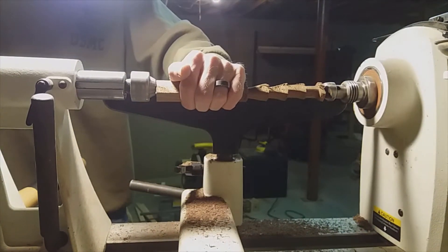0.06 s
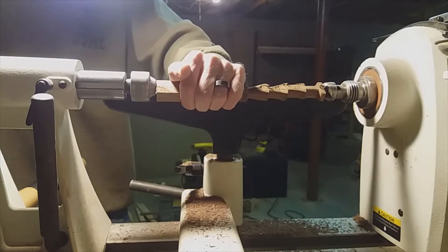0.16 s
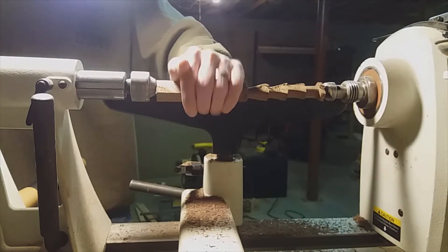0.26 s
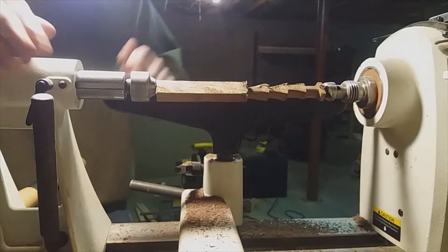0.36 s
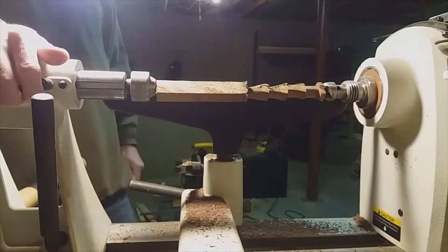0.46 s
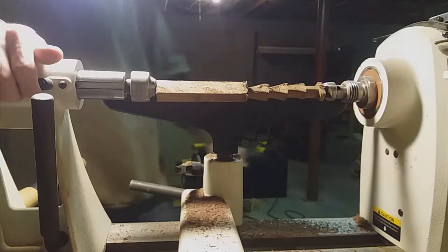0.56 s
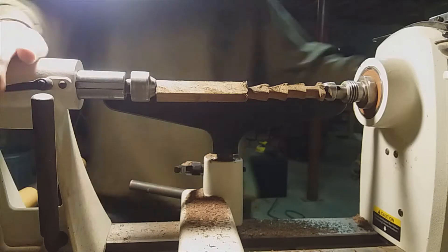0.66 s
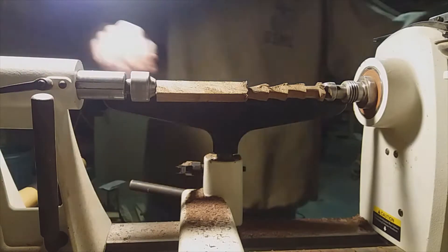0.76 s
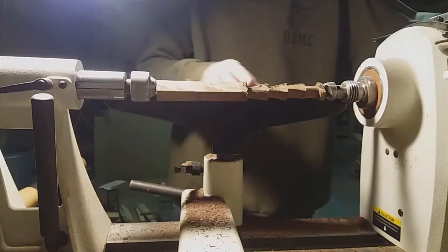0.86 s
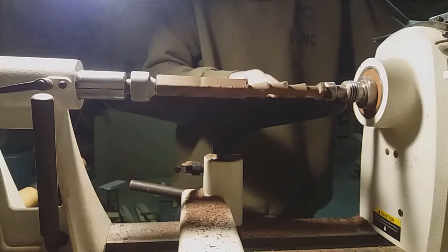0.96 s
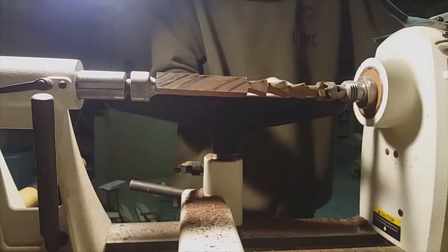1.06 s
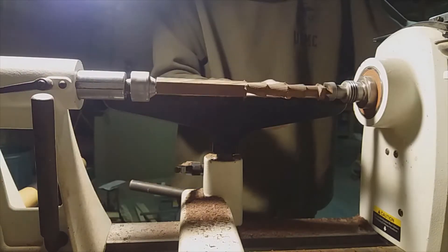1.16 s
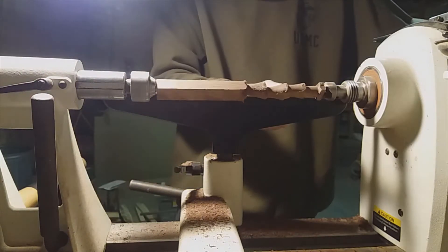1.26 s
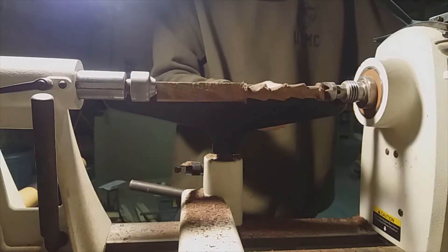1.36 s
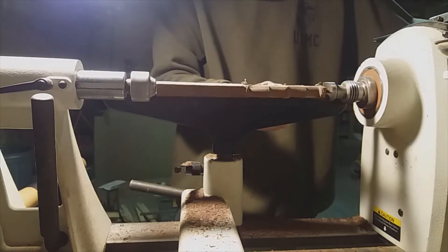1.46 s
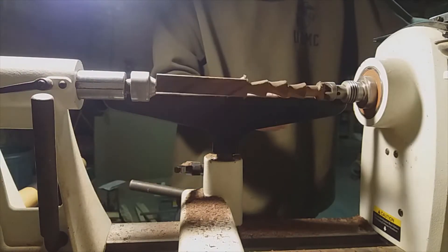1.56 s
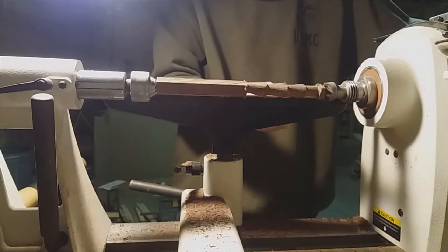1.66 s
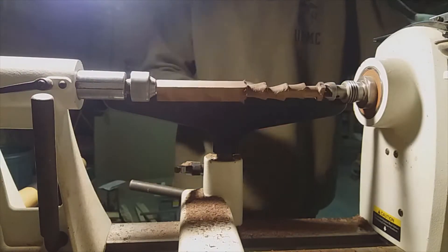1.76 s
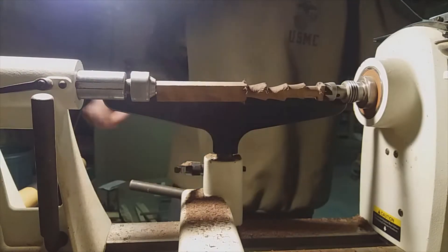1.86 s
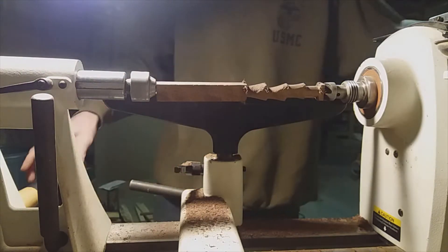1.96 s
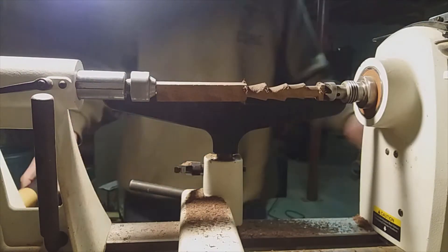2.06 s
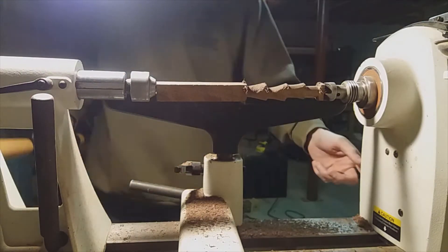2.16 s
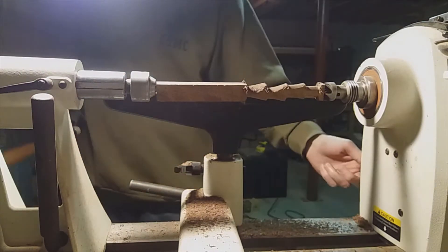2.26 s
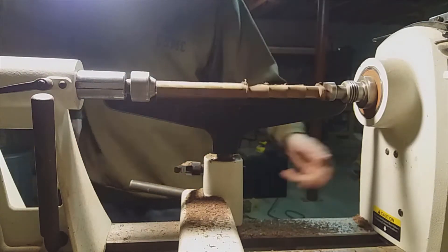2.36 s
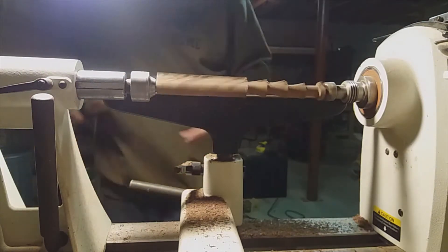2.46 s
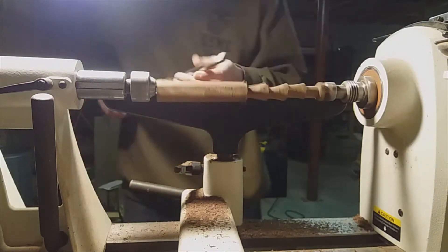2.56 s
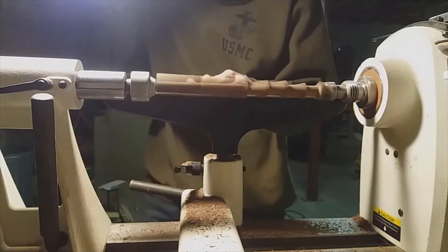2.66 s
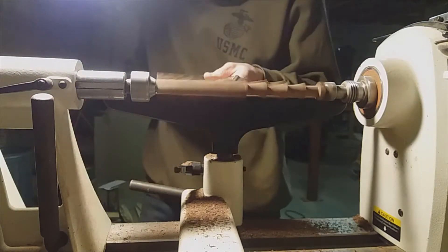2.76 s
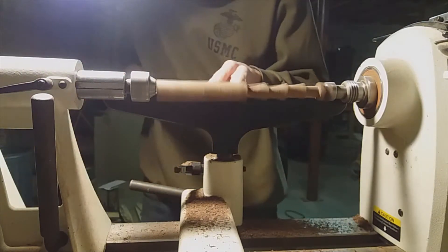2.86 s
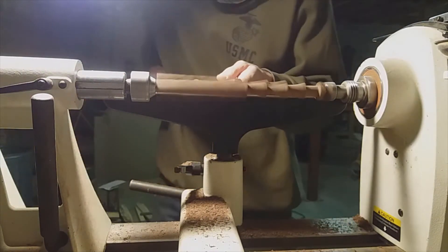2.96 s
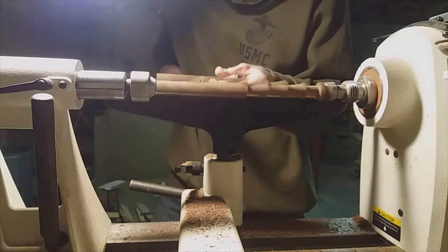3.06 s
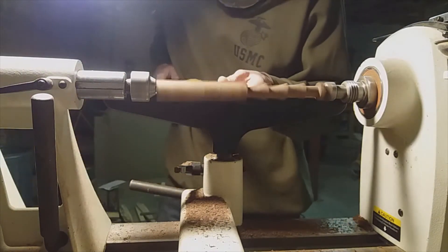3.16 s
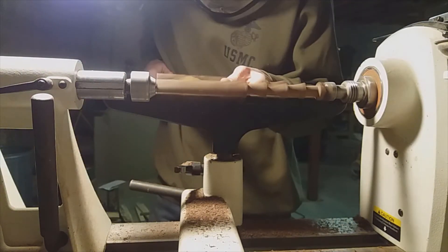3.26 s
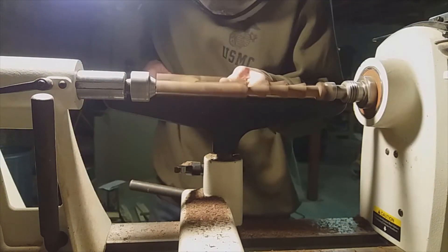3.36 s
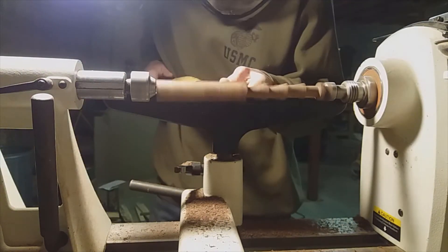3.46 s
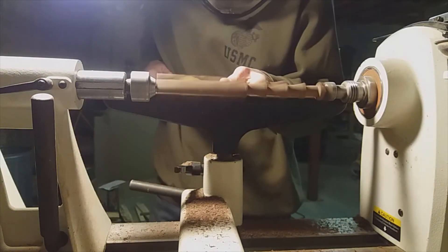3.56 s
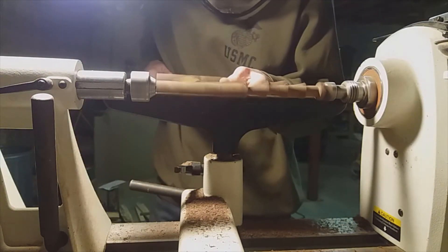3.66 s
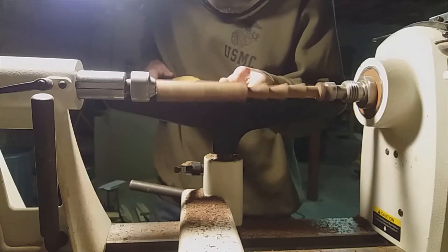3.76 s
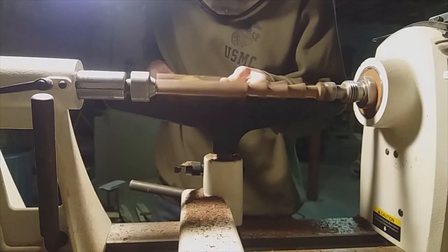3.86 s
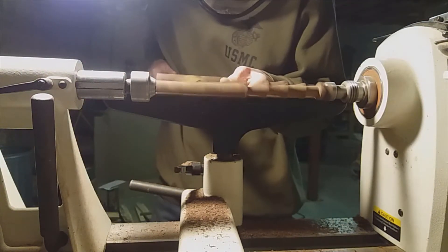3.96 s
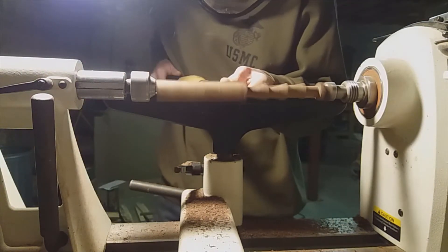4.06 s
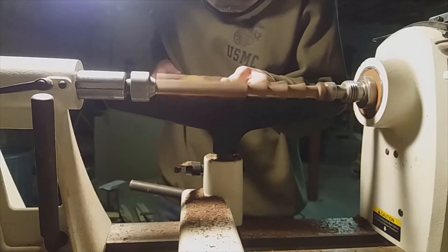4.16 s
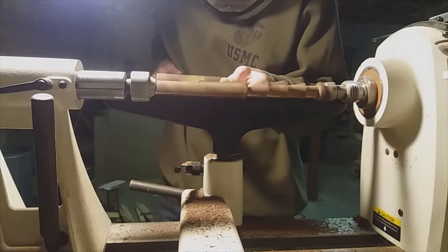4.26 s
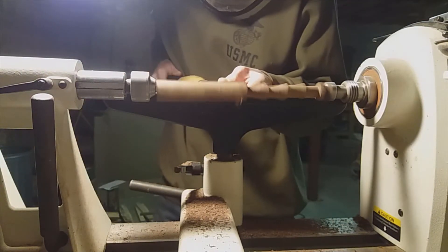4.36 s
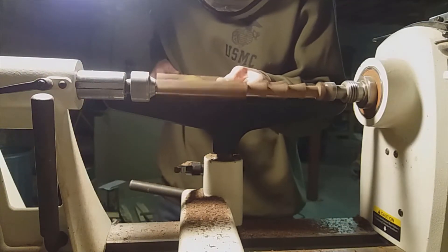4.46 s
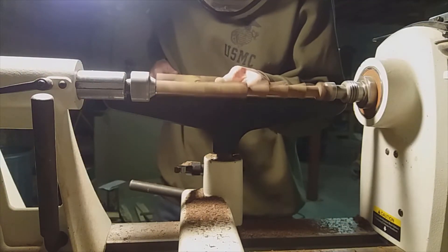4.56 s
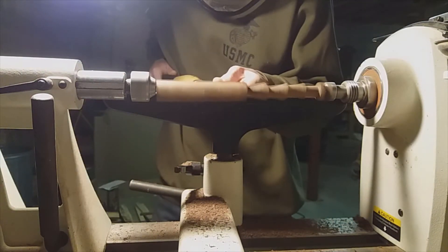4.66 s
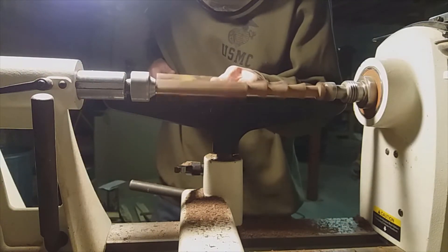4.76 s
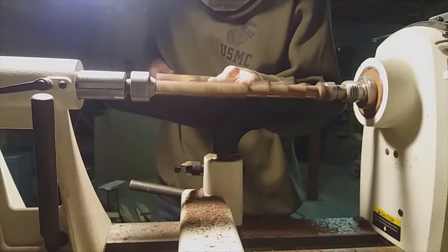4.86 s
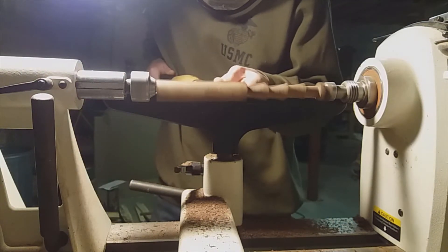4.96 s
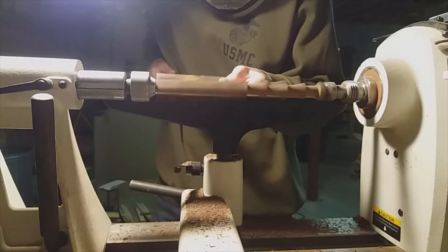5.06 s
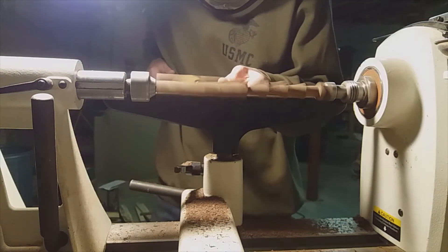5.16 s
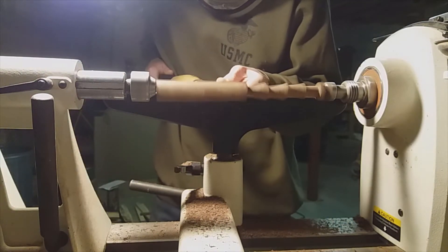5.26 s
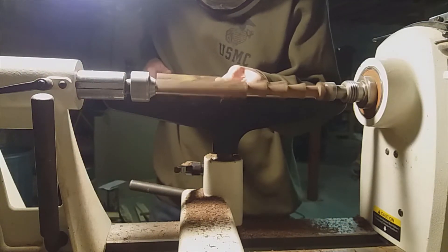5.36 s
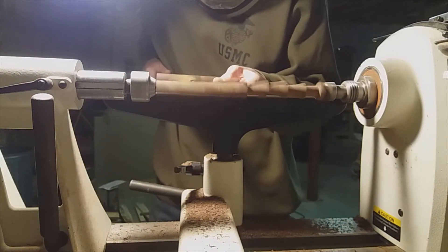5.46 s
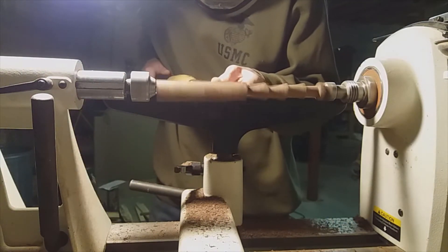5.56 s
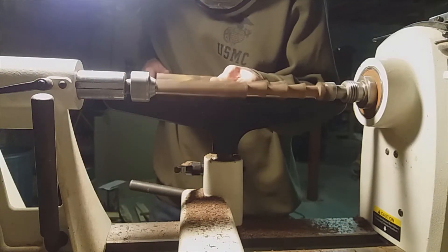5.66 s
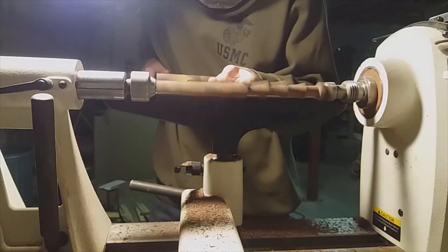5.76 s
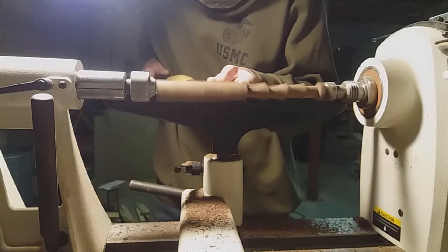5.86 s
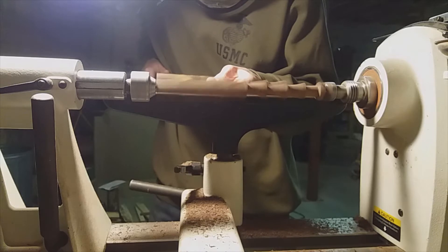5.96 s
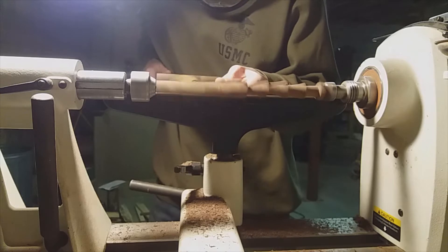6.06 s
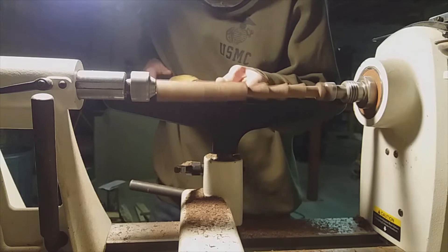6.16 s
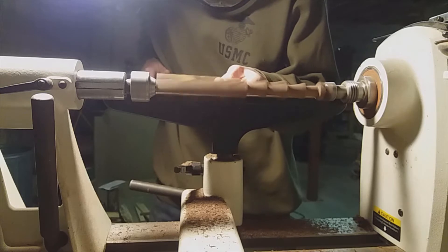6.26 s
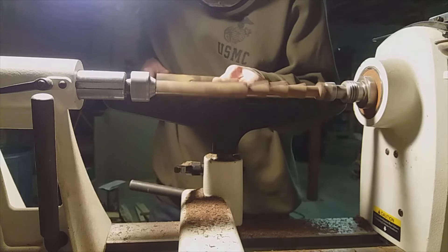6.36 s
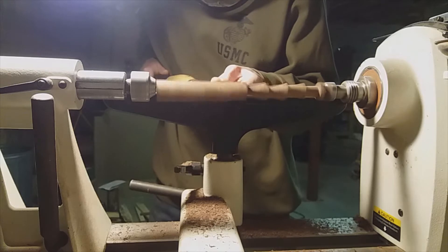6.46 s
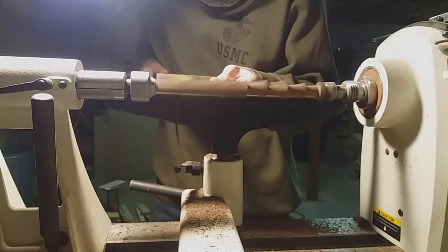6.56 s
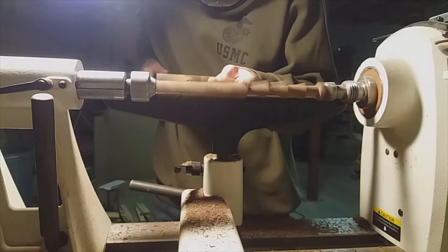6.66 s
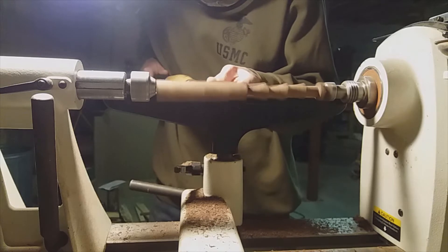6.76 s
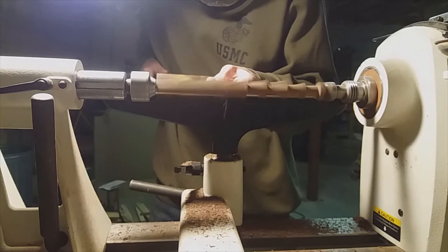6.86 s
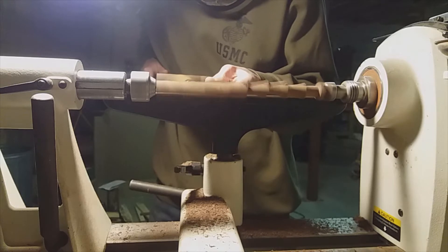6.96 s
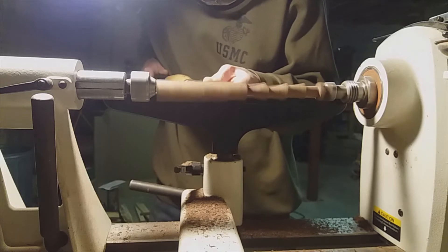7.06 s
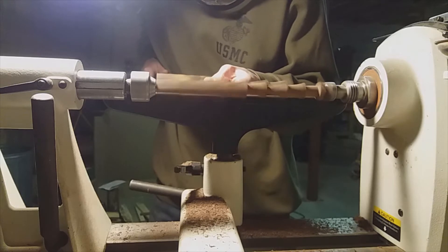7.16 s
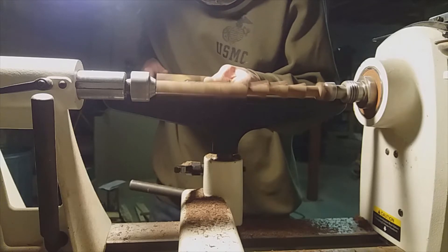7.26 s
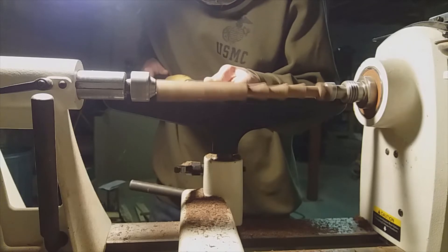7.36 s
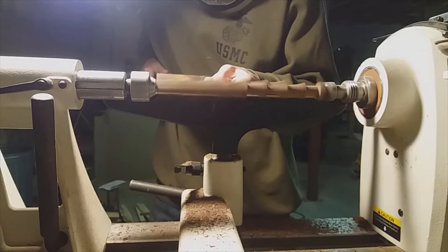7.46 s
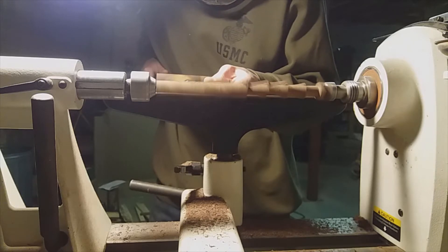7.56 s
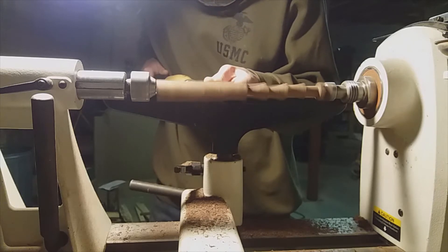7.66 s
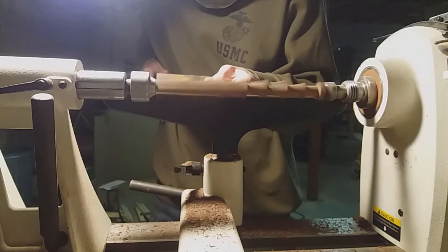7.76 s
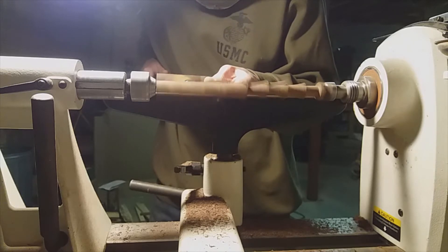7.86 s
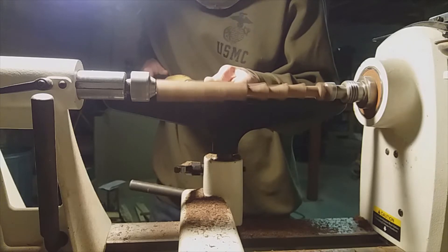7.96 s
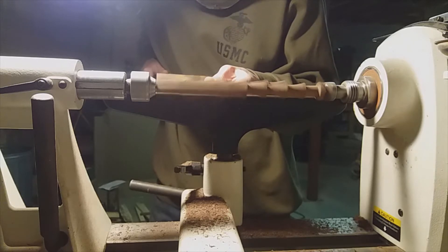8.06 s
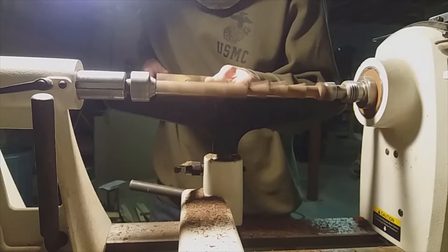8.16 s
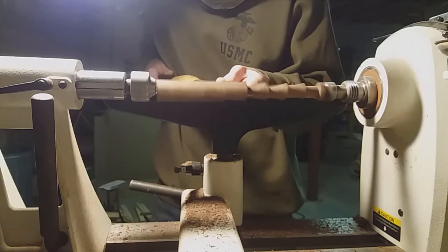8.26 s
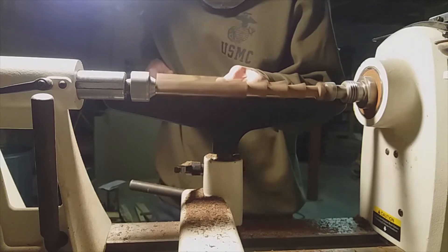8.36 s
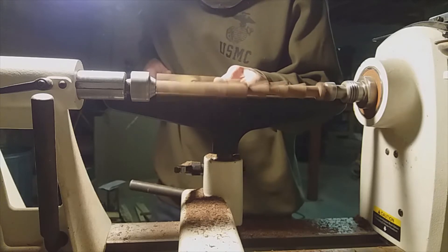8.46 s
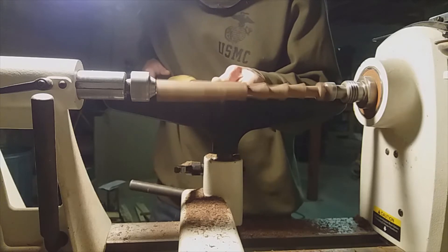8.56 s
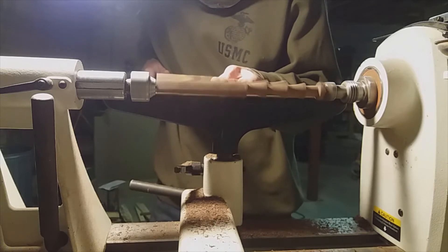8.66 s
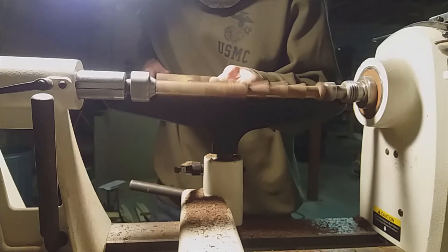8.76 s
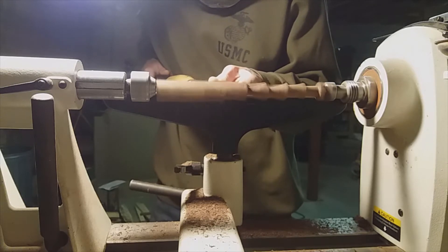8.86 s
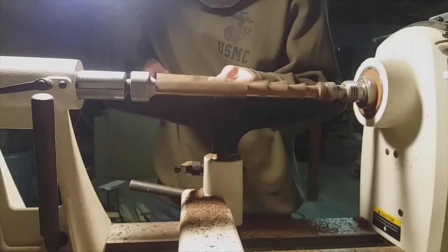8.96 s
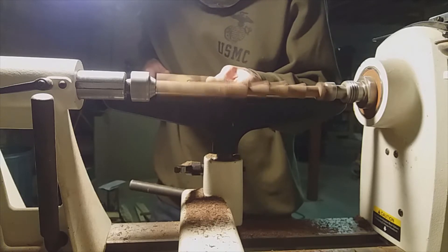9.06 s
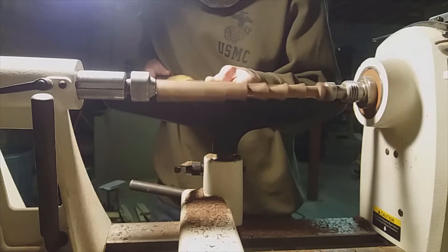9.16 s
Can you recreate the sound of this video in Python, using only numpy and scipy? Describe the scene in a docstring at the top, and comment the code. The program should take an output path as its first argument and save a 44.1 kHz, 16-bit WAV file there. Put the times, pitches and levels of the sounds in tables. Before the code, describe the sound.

For the first 2.3 seconds a workshop fan hums and rushes quietly, with faint brushes of cloth near 0.45, 0.8 and 2.0 seconds. At 2.3 a switch clicks sharply with a short boxy knock, and a wood lathe whines up from rest, reaching full speed by 2.9. It holds a high, slowly beating whistle over motor drone, frame rumble and bearing hiss; a small tick comes near 3.2. Sandpaper then presses the spinning wood in five strokes: 4.0-4.9, 5.1-6.0, 6.2-6.9, 7.15-8.15 and 8.3-9.2. Each is a harsh, rapid flutter of about 57 bites a second, with ringing chatter around 2-3 kHz, squeal, gritty hiss and hollow woody resonance. The first lands abruptly and surges unevenly. At 4.7 the bass drops and stays thin. The fourth grows and briefly screeches near 8.1. The lathe whines on between and after strokes. Close pickup, leaning left.

```python
"""A fan hums and rushes and cloth brushes softly; then a switch clicks and a wood lathe whines up to speed.
Sandpaper pressed on the spinning wood in five strokes bites once a turn, because the wood is not quite round:
a fast rasping flutter that rings the workpiece. Part way through, the bass steps down and stays down.
The wood and frame are modal resonators driven by noise, the motor, belt and fan hum are sums of sines,
and the air, grit, bearings and cloth are noise shaped by spectra."""
import sys
import numpy as np
from scipy import signal
from scipy.fft import rfft, irfft, next_fast_len
from scipy.io import wavfile
from scipy.ndimage import map_coordinates

SR = 44100
rng = np.random.default_rng(int(sys.argv[2]) if len(sys.argv) > 2 else 0)


def int16_out(signal):
    """Quantize to a 16-bit WAV file."""
    q = np.round(np.clip(np.atleast_2d(signal).T, -1, 1) * 32767)
    wavfile.write(sys.argv[1], SR, q.astype(np.int16))


N = 405276  # samples

# Sanding strokes. Each row: start in seconds, end in seconds, attack in seconds, chatter of the wood in dB,
# its squeal in dB, hiss of the grit in dB, hollow ring in dB, growth in dB per second, landing in dB,
# rebound in dB. The four sound levels are those before the pressure of the hand is added.
STROKES = [(4.032, 4.901, 0.0015, -30, -32, -35.5, -34, 4.5, 8, 4),
           (5.092, 5.969, 0.0048, -25.5, -27.5, -28, -27.5, -1, -2, 2),
           (6.184, 6.929, 0.0082, -25.5, -27.5, -28.5, -31, 2, 2, -1.5),
           (7.154, 8.157, .002, -24.5, -23.5, -28, -35, 5, -1.5, 2),
           (8.336, 9.195, 0.0069, -25, -26, -28.5, -33.5, -2, -1, 0.5)]
# Brief changes of the hand's pressure within a stroke. Each row: time in seconds, change in dB.
PUSHES = [(4.322, 6), (4.357, -4.5), (4.395, 4), (4.515, 3.5), (4.607, 5.5), (4.675, -5.5), (4.792, 6),
          (5.36, 1.5), (5.925, 1.5), (6.385, 1.5), (6.88, 2.5), (7.84, 2), (7.9, -0.5), (8.14, 0), (8.5, 2),
          (8.76, 3.5), (9.11, -3)]
# How hard the paper bites round one turn. Each row: share of a turn, level in dB.
BITE_ROUND_TURN = [(0, -1.5), (.16, -8), (.35, -11.5), (.63, -15.5), (.7, -3), (.8, -0.5), (.9, -4)]
# Chattering high modes of the workpiece between its centres. Each row: frequency in Hz, width in Hz, level in dB.
CHATTER_MODES = [(1729, 17, 6.5), (1898, 99, 3.5), (2052, 77, 9), (2315, 74, 8), (2590, 90, -3.5),
                 (2764, 26, 8.5), (2960, 11, 16), (4920, 42, -6.5)]
# Hollow low modes of the workpiece. Each row: frequency in Hz, width in Hz, level in dB.
HOLLOW_MODES = [(919, 11.5, -13.5), (1151.8, 23, -3.5), (1268, 7.2, 2)]
# Left-right likeness of the wood's ring. Each row: frequency in Hz, coherence.
WORKPIECE_LIKENESS = [(1000, 0.89), (2300, 0.72), (3200, 0.25)]
# Hiss of the grit. Each row: frequency in Hz, relative density in dB per Hz.
GRIT_SPECTRUM = [(300, -25), (1400, -4.5), (3200, 3), (4000, -6.5), (5500, -4.5), (6450, 1.5), (7500, -2),
                 (9000, -7), (10200, -4), (12000, -11.5), (13500, -3), (14800, -12), (16000, -11)]
# Snags of the paper. Each row: time in seconds, half length in seconds, level in dB.
SNAGS = [(8.075, 0.041, -23)]
# Resonances of the screech. Each row: frequency in Hz, width in Hz, level in dB.
SCREECH_MODES = [(1660, 110, 8), (3350, 280, 6), (4950, 340, 6), (6650, 610, 0)]
# Run-up of the lathe. Each row: time in seconds, share of full speed.
SPEED = [(2.35, 0), (2.5, .35), (2.62, .6), (2.71, .72), (2.77, .8), (2.8, .89), (2.85, .965), (2.91, 1)]
# Motor lines. Each row: multiple of the motor's speed, rms level in dB before the drone or whistle gain.
MOTOR_ORDERS = [(5, -53), (6, -38), (12, -44), (16, -53), (18, -56), (24, -52), (35, -43), (36, -40.5),
                (37, -48), (48, -61)]
# Belt lines. Each row: multiple of the belt's rate, rms level in dB before the drone or whistle gain.
BELT_ORDERS = [(7, -58.5), (9, -57), (11, -56.5), (14, -49)]
# How the motor housing favours each pitch. Each row: frequency in Hz, gain in dB.
HOUSING_GAIN = [(150, -34), (420, -17.5), (490, -2), (1800, 17), (2100, 18), (2600, 11), (2800, 12),
                (2930, 25), (3100, 17), (3250, 10), (4000, -4)]
# Resonances of the lathe's frame. Each row: frequency in Hz, width in Hz, level in dB.
FRAME_MODES = [(240, 77, -13), (372, 94, -5), (513, 85, -2.5), (824, 14.5, 8), (1000, 66, -6),
               (1240, 72, -3.5)]
# Hiss of the bearings. Each row: frequency in Hz, relative density in dB per Hz.
BEARINGS_SPECTRUM = [(600, -25), (1700, -13.5), (2080, -4.5), (2400, -9.5), (2800, -10.5), (3000, 5.5),
                     (3300, -7.5), (4700, -14.5), (6500, -11.5), (9000, -18), (12500, -25.5), (16000, -28)]
# Rings of the tail centre running free. Each row: frequency in Hz, width in Hz, level in dB.
CENTRE_FREE = [(6556, 114, 2.5), (8360, 150, -11.5), (10000, 170, -13), (13937, 200, -15.5)]
# Its rings once the paper has pressed on the wood. Each row: frequency in Hz, width in Hz, level in dB.
CENTRE_LOADED = [(6270, 300, 0), (14600, 200, -19)]
# Clicks: the switch, then a tick of the lathe. Each row: time in seconds, crack in dB, knock in dB.
CLICKS = [(2.3174, -30, -23), (3.176, -26, -55)]
# Modes of the switch box. Each row: frequency in Hz, level in dB, decay by 60 dB in seconds.
SWITCH_BOX = [(530, -9, 0.12), (603, -1.5, 0.046), (670, -17, 0.067), (1943, -26, 0.087),
              (2830, -25, 0.071), (3580, -19, 0.031), (4520, -7, 0.017)]
# Brushes of a sleeve. Each row: time in seconds, half length in seconds, level in dB.
BRUSHES = [(.45, .04, -60), (0.782, 0.084, -46), (2.008, 0.011, -52.5), (2.786, .012, -45)]
# Rustle of cloth. Each row: frequency in Hz, relative density in dB per Hz.
CLOTH_SPECTRUM = [(1000, -14), (2600, -12), (3400, 1), (4800, -1.5), (6500, -9), (10000, -12), (15000, -18)]
# Air of the fan. Each row: frequency in Hz, relative density in dB per Hz.
AIR_SPECTRUM = [(25, -22), (90, -35.5), (160, -15.5), (330, -16), (500, -0.5), (620, -10), (900, -7),
                (1150, -11), (1500, -21), (2700, -20), (4000, -26), (5600, -28), (8000, -33),
                (15500, -40.5)]
# Steady lines of the fan. Each row: frequency in Hz, rms level in dB.
HUM_LINES = [(177.6, -53.5), (274.5, -60), (360.7, -62), (532.9, -66), (553, -54.5), (10497, -81)]
# Left-right likeness of near sound. Each row: frequency in Hz, coherence.
NEAR = [(60, -0.081), (200, 0.35), (1000, 0.76), (2300, 0.13), (3200, -0.27), (4500, -0.32), (6800, -0.28),
        (14000, 0.059)]
# Left-right likeness of scattered sound. Each row: frequency in Hz, coherence.
DIFFUSE = [(60, 0.22), (180, 0.96), (700, 0.82), (1500, 0.5), (4000, 0), (14000, 0)]
# Balance of the whole scene. Each row: frequency in Hz, left minus right in dB.
LEAN = [(60, -2), (180, 5), (600, 3), (1300, 2), (2300, 6), (4400, 0.5), (8000, 1), (14000, -1)]
# Spectrum after the bass steps down. Each row: frequency in Hz, gain in dB.
BASS_STEP = [(100, -2), (180, -9.5), (450, -8), (800, -6), (1200, -3), (1800, 0.5)]

# at full speed
SPINDLE_HZ, MOTOR_HZ, BELT_HZ = 56.7, 83.72, 34.27
SPINDLE_DRIFT_HZ, SPINDLE_DRIFT_TURNS = 3, 0.0154  # the spindle gives and gains a little under the hand
SQUEAL_HZ = 2297
RIGHT_LEAD_S = .00004
TREMOR_HZ, TREMOR_DB = 30.3, 0.95  # unsteadiness of the hand's pressure
PUSH_HALF_S = .02
# pressure bumps, up or down, soon after the paper lands and again later
LANDING_AT_S, LANDING_HALF_S = .019, .034
REBOUND_AT_S, REBOUND_HALF_S = 0.15, 0.12
HISS_FOLLOWS, HOLLOW_FOLLOWS = 0.95, 1.2  # dB for each dB of pressure
HOLLOW_WANDER_HZ, HOLLOW_WANDER_DB = 14, 1.53  # the hollow ring comes and goes as the paper travels
LOAD_SHIFT = .045  # share by which the housing's resonance rises under load
# gains at full speed, and the power of the speed by which each grows in the run-up
DRONE_DB, DRONE_POWER = -1, 2.4
WHISTLE_DB, WHISTLE_POWER = 0.5, 4.5
RUMBLE_DB, RUMBLE_POWER = -39.5, 3.5
BEARINGS_DB, BEARINGS_POWER = -42, 1.4
# the housing's whistle swells and fades in a slow beat
BEAT_S, BEAT_PEAK_S, BEAT_DB = 2.11, 2.69, 4
STEP_S = 4.72
TOP_HZ = 16000


def amp(db):
    """Logarithmic level: decibels to gain."""
    return 10 ** (np.asarray(db) / 20)


def unit(x):
    """Normalisation by power: scale to rms 1."""
    return x / np.sqrt(np.mean(x ** 2) + 1e-20)


def clock():
    """Uniform sampling: the time of every sample in seconds."""
    return np.arange(N) / SR


def along(points, hz):
    """Logarithmic pitch: interpolate (Hz, value) points on a log frequency axis."""
    f, v = np.transpose(points)
    return np.interp(np.log(hz + 1), np.log(f + 1), v)


def curves(rows):
    """Linear interpolation in time: one value per sample for each column after the time."""
    s, *cols = np.transpose(rows)
    return [np.interp(clock(), s, c) for c in cols]


def wobble(rate):
    """Slow random fluctuation: a smooth curve through random knots, rate of them a second."""
    return map_coordinates(rng.standard_normal(int(N * rate / SR) + 4), [clock() * rate])


def white():
    """Flat spectrum: two unrelated white noises."""
    return rng.standard_normal((2, N))


def filtered(x, response):
    """Linear filtering: multiply the spectrum of x by a complex response of frequency."""
    m = next_fast_len(N + SR // 4)
    return irfft(rfft(x, m) * response(np.fft.rfftfreq(m, 1 / SR)), m)[..., :N]


def coloured(x, spectrum):
    """Spectral shaping: weight x by (Hz, dB) points."""
    return filtered(x, lambda hz: amp(along(spectrum, hz)))


def resonate(x, modes, low_hz, polarity=-1):
    """Modal superposition: x drives a sum of damped modes; the body radiates little below low_hz."""
    def body(f):
        total = 0
        for k, (centre, width, db) in enumerate(modes):
            damping = 1j * f * width
            # each mode is weighted by one more factor of the polarity
            total = total + polarity ** k * amp(db) * damping / (centre * centre - f * f + damping)
        return total

    radiation = signal.butter(4, low_hz, "high", fs=SR, output="sos")
    return signal.sosfilt(radiation, filtered(x, body))


def spread(pair, alike):
    """Interaural coherence: mix a middle and a side to a given left-right likeness; the middle has rms 1."""
    def weights(hz):
        turn = np.arccos(np.clip(along(alike, hz), -1, 1)) / 2
        return np.array([np.cos(turn), np.sin(turn)])

    mid, side = filtered(pair, weights)
    return np.array([mid + side, mid - side]) / np.std(mid)


def sanding():
    """Periodic excitation: the high side strikes the paper once a turn, the wood chatters and the grit hisses."""
    chatter, slip, hiss, hollow = pressing()
    turns = SPINDLE_HZ * clock() + SPINDLE_DRIFT_TURNS * wobble(SPINDLE_DRIFT_HZ)
    # each pass of the high side has its own strength
    strengths_db = 1.2 * rng.standard_normal(int(turns[-1]) + 2)
    pass_db = strengths_db[(turns + 1 / 3).astype(int)]
    bite = amp(np.interp(turns, *np.transpose(BITE_ROUND_TURN), period=1) + pass_db)
    scrape = bite * surface(turns, memory=0.63)

    rasp = spread(resonate(scrape, CHATTER_MODES, low_hz=1760, polarity=0.88), WORKPIECE_LIKENESS)
    hollow_ring = spread(resonate(scrape, HOLLOW_MODES, low_hz=860), WORKPIECE_LIKENESS)
    wood = chatter * rasp + slip * squeal(turns, stray=1.0) + hollow * hollow_ring
    # the workpiece is heard a little earlier on the right
    ears = np.array([[-1], [1]])
    wood = filtered(wood, lambda hz: np.exp(1j * np.pi * hz * RIGHT_LEAD_S * ears))

    # single grains catch and tear free
    catches = amp(3.3 * wobble(1500))
    grit = spread(coloured(bite * catches * white(), GRIT_SPECTRUM), NEAR)
    return wood + hiss * grit


def pressing():
    """Common modulation: one pressure of the hand drives chatter, squeal, hiss and hollow ring in every stroke."""
    t = clock()
    pushes_db = sum(db * np.exp(-((t - s) / PUSH_HALF_S) ** 2) for s, db in PUSHES)
    hand_db = TREMOR_DB * wobble(TREMOR_HZ) + pushes_db
    wander_db = HOLLOW_WANDER_DB * wobble(HOLLOW_WANDER_HZ)
    levels = np.zeros((4, N))
    for (start, end, attack, chatter_db, squeal_db, hiss_db, hollow_db,
         growth, landing_db, rebound_db) in STROKES:
        since = np.clip(t - start, 0, end - start)
        release = amp(-60 * np.maximum(t - end, 0) / 0.11)
        touching = np.clip(since / attack, 0, 1) * release
        landing = landing_db * np.exp(-((since - LANDING_AT_S) / LANDING_HALF_S) ** 2)
        rebound = rebound_db * np.exp(-((since - REBOUND_AT_S) / REBOUND_HALF_S) ** 2)
        press_db = hand_db + landing - rebound + growth * (since - (end - start) / 2)
        levels += touching * amp([chatter_db + press_db,
                                  squeal_db + press_db,
                                  hiss_db + HISS_FOLLOWS * press_db,
                                  hollow_db + HOLLOW_FOLLOWS * press_db + wander_db])
    return levels


def surface(turns, memory):
    """Correlated roughness: the wood is much the same each turn, slowly renewed as the paper travels."""
    size = round(SR / SPINDLE_HZ)
    keep = np.clip(memory, 0, .99)
    fresh = rng.standard_normal((2, int(turns[-1]) + 2, size))
    tracks = signal.lfilter([1], [1, -keep], fresh, axis=1)  # each turn remembers the one before
    return np.array([np.interp(turns * size, np.arange(track.size), track.ravel()) for track in tracks])


def squeal(turns, stray):
    """Stick-slip: at each strike the paper slips and gives one short, nearly pure burst at the squeal's pitch."""
    turn, share = np.divmod(turns - .65, 1)
    turn = turn.astype(int)
    since = share / SPINDLE_HZ
    draws = rng.standard_normal((int(turns[-1]) + 2, 2))
    # the slip starts much as it did on the turn before
    start_phase = signal.lfilter([stray], [1, -.7], draws[:, 0])[turn]
    size = amp(1.6 * draws[:, 1])[turn]
    burst = (1 - np.exp(-(since / 0.0016) ** 2)) * np.exp(-(since / 0.0099) ** 3)
    return unit(size * burst * np.sin(2 * np.pi * SQUEAL_HZ * since + start_phase))


def snags():
    """Sustained friction: the paper clings for a few turns and screeches without a break between strikes."""
    grip = sum(amp(db) * np.exp(-np.abs((clock() - s) / half) ** 4) for s, half, db in SNAGS)
    return grip * spread(resonate(white(), SCREECH_MODES, low_hz=1300), NEAR)


def load():
    """Loading of a machine: 0 while the lathe runs free, 1 once the sanding has loaded it."""
    return np.clip((clock() - 4.05) / .45, 0, 1)


def motor():
    """Order excitation: wavering motor and belt lines flare in the run-up as they sweep the housing's resonance."""
    speed, = curves(SPEED)
    drone = amp(DRONE_DB) * speed ** DRONE_POWER
    beat_db = BEAT_DB * np.cos(2 * np.pi * (clock() - BEAT_PEAK_S) / BEAT_S)
    whistle = amp(WHISTLE_DB + beat_db) * speed ** WHISTLE_POWER
    # radians per Hz of a line's full-speed pitch
    angle = 2 * np.pi * np.cumsum(speed * (1 + 0.00056 * wobble(5))) / SR
    lines = [(order * MOTOR_HZ, db) for order, db in MOTOR_ORDERS]
    lines += [(order * BELT_HZ, db) for order, db in BELT_ORDERS]
    stiffening = 1 + LOAD_SHIFT * load()  # under load the housing favours a slightly higher line
    tones = np.zeros(N)
    for hz, db in lines:
        flare_db = along(HOUSING_GAIN, hz * speed / stiffening) - along(HOUSING_GAIN, hz)
        drive = whistle if hz > 2500 else drone
        level = amp(db + flare_db + 1.8 * wobble(12))
        tones += drive * level * np.sin(hz * angle + 0.23 * wobble(30))
    return np.sqrt(2) * tones  # rms to peak


def headstock():
    """Forced resonance: belt and bearings shake the frame and hiss; the tail centre's ring changes under load."""
    speed, = curves(SPEED)
    rumble = spread(resonate(white(), FRAME_MODES, low_hz=168), NEAR)
    hiss = spread(coloured(white(), BEARINGS_SPECTRUM), NEAR)
    loaded = load()
    free = spread(resonate(white(), CENTRE_FREE, low_hz=4020), NEAR)
    pressed = spread(resonate(white(), CENTRE_LOADED, low_hz=4020), NEAR)
    centre = amp(-3.5) * (1 - loaded) * free + amp(-6.0) * loaded * pressed
    frame = amp(RUMBLE_DB) * speed ** RUMBLE_POWER * rumble
    return frame + amp(BEARINGS_DB) * speed ** BEARINGS_POWER * (hiss + centre)


def clicks():
    """Impulse response: a sharp crack with a short room tail, and the decaying modes of the switch box."""
    cracks, knocks = np.zeros((2, N)), np.zeros(N)
    t = np.arange(SR // 4) / SR
    for s, crack_db, knock_db in CLICKS:
        decay = amp(-60 * t / 0.037) + amp(-20.5 - 60 * t / 0.39)  # crack, then room tail
        crack = decay * rng.standard_normal((2, len(t)))
        knock = sum(amp(db - 60 * t / t60) * np.sin(2 * np.pi * hz * t) for hz, db, t60 in SWITCH_BOX)
        knock = knock * (1 - np.exp(-t / 0.00074))  # soft onset
        span = slice(round(s * SR), round(s * SR) + len(t))
        cracks[:, span] += amp(crack_db) * crack
        knocks[span] += amp(knock_db) * knock
    return coloured(cracks + knocks, [(100, -30), (300, -11), (480, 4.5)])


def sleeve():
    """Friction noise: cloth brushes softly as the turner moves round the lathe."""
    swell = sum(amp(db) * np.exp(-np.abs((clock() - s) / half) ** 3) for s, half, db in BRUSHES)
    return swell * amp(2.0 * wobble(120)) * spread(coloured(white(), CLOTH_SPECTRUM), DIFFUSE)


def fan():
    """Broadband flow noise with discrete tones: a nearly steady rush of air with a few faint lines."""
    air = amp(-45.0 + 0.14 * wobble(20)) * spread(coloured(white(), AIR_SPECTRUM), DIFFUSE)
    hum = np.zeros(N)
    for hz, db in HUM_LINES:
        level = amp(db + 0.89 * wobble(2.02))
        hum += level * np.sin(2 * np.pi * hz * clock() + 0.23 * wobble(9.3))
    return air + np.sqrt(2) * hum  # rms to peak


def scene():
    """Superposition: all sources add, then a level difference leans them mostly to the left."""
    shop = sanding() + snags() + motor() + headstock() + clicks() + sleeve() + fan()
    sides = np.array([[1], [-1]])
    return filtered(shop, lambda hz: amp(sides * along(LEAN, hz) / 2))


def record(dry):
    """Filtering and saturation: the bass steps down for good, tall peaks are rounded, the band ends at TOP_HZ."""
    stepped = np.clip((clock() - STEP_S) / 0.015 + .5, 0, 1)
    sound = (1 - stepped) * dry + stepped * coloured(dry, BASS_STEP)
    sound = sound / (1 + np.abs(sound / .9) ** 6) ** (1 / 6)
    return filtered(sound, lambda hz: hz < TOP_HZ)


dry = scene()
out = record(dry)
int16_out(out)
```